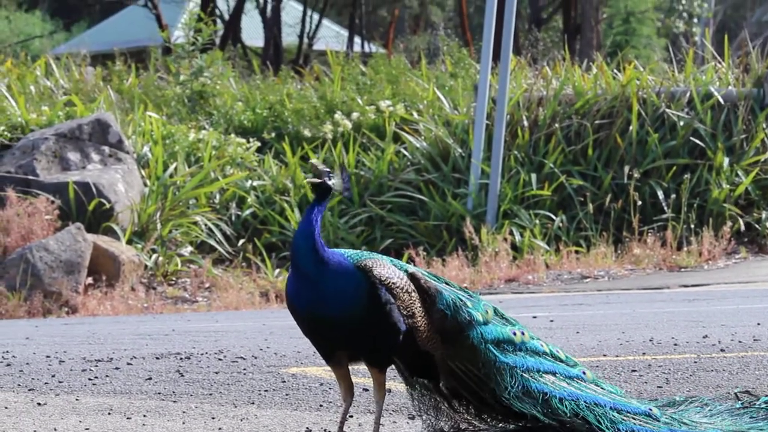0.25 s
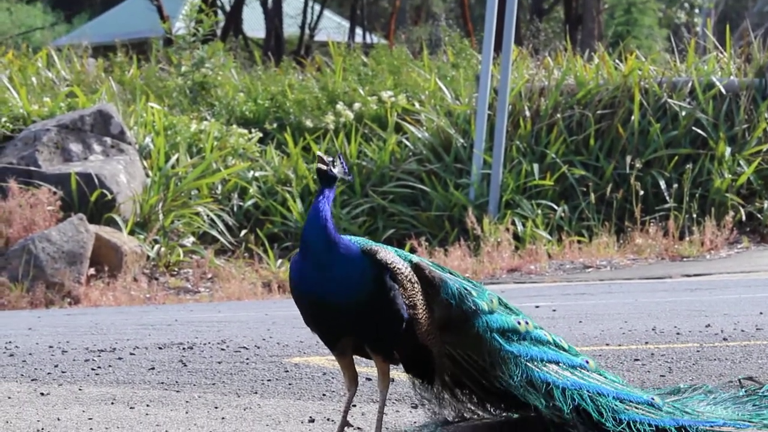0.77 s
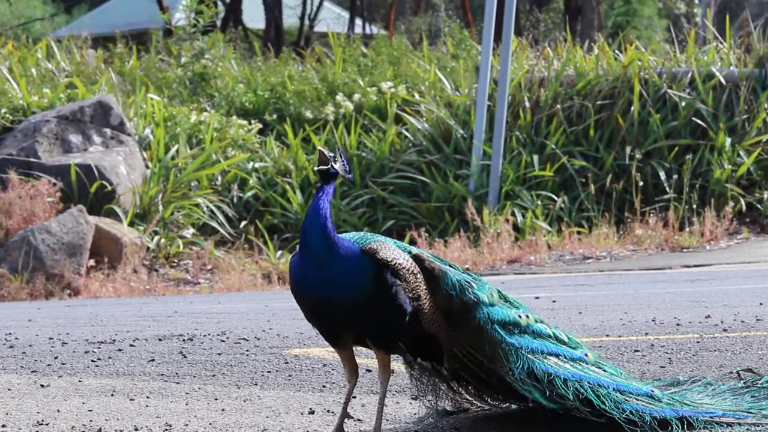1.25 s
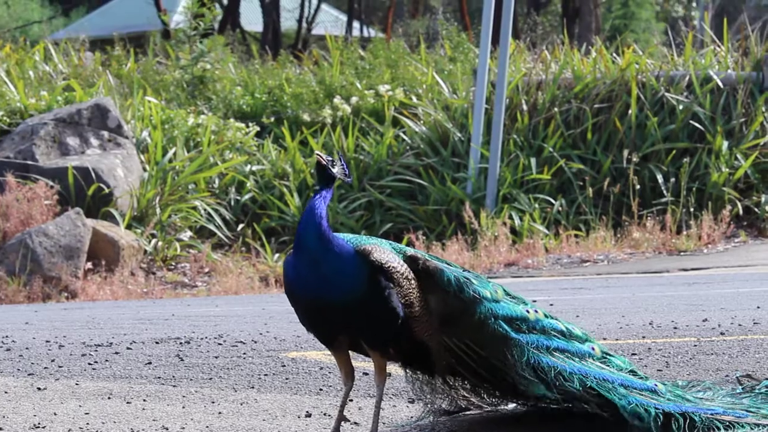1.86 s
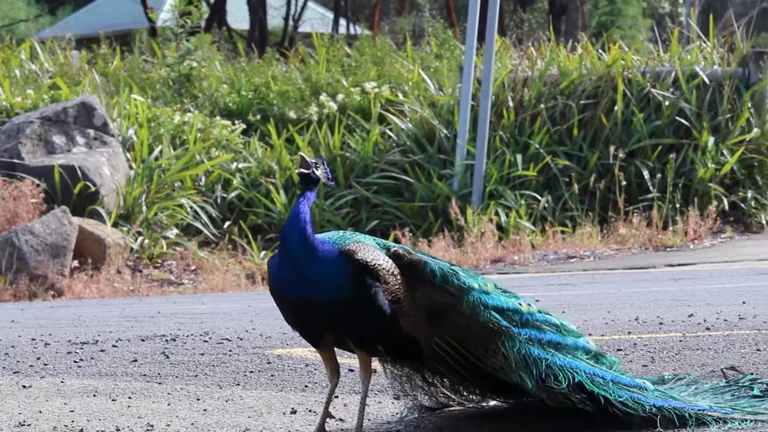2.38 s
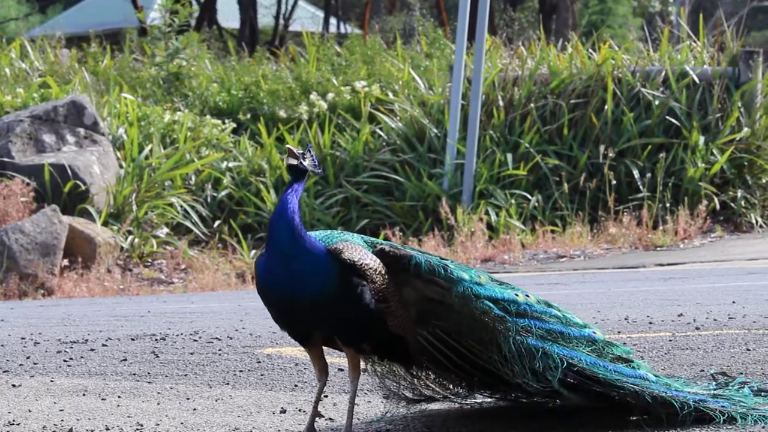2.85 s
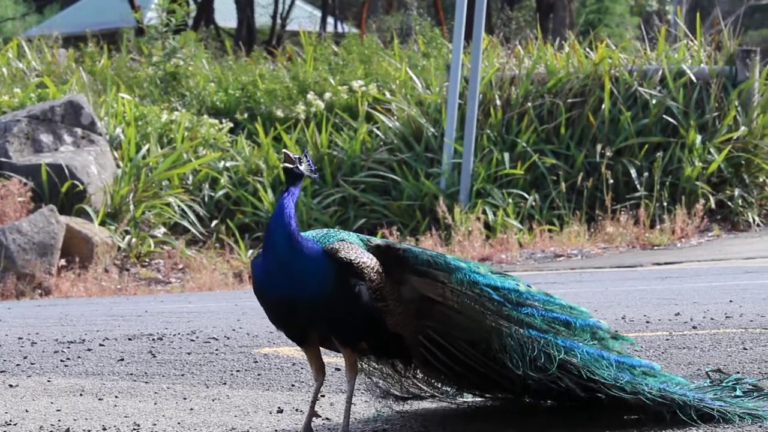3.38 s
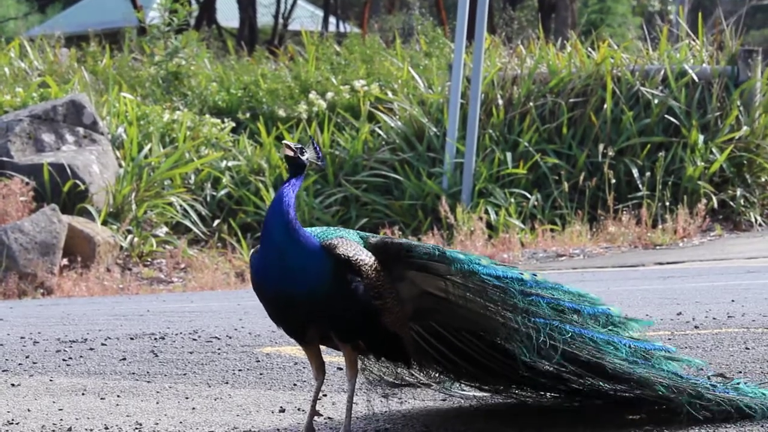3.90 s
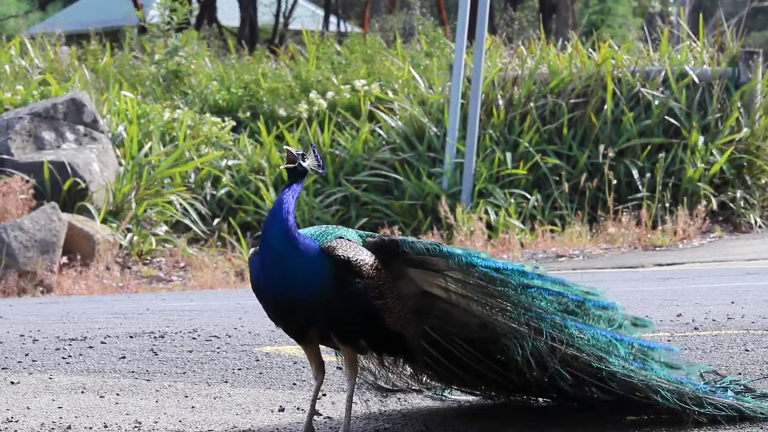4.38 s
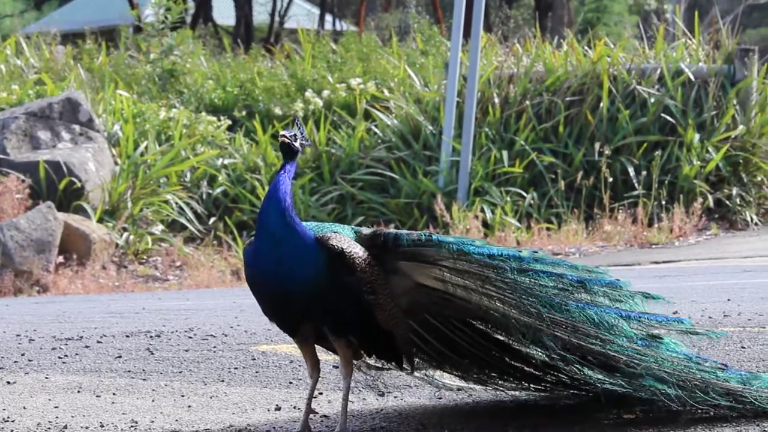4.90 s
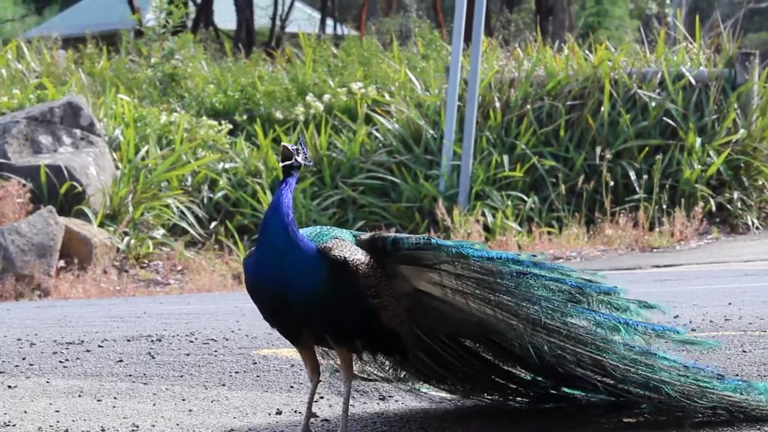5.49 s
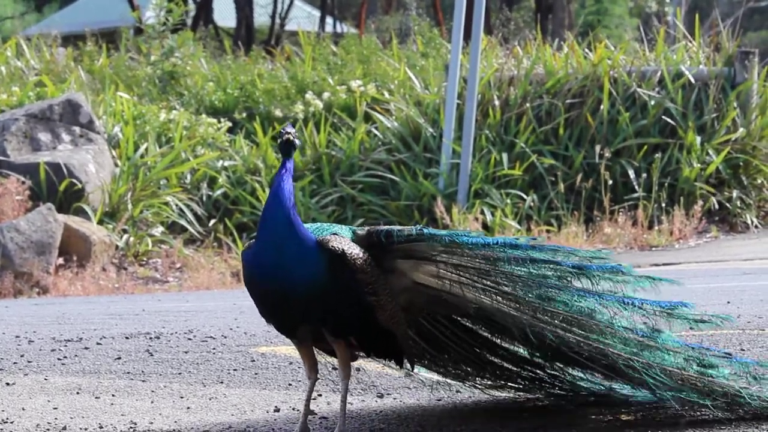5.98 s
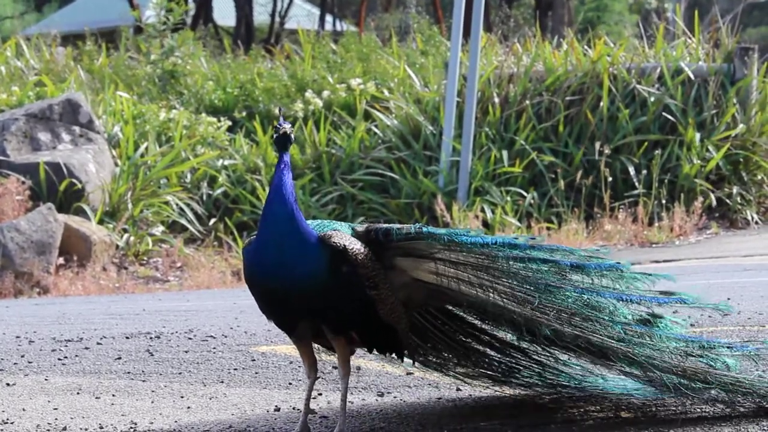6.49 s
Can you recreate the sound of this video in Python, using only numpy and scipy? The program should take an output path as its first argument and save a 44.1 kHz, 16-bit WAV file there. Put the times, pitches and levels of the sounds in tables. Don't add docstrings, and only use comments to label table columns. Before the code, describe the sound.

Outdoors by a road, a peacock close to the microphone gives six loud, brassy, wailing cries, each a little over half a second, rising quickly and sagging at the end. The first wavers; gaps gradually lengthen. Sharp near echoes and a faint tree reverberation follow each call. Low traffic rumble, tyre hiss, an idling engine and a thin insect buzz sit beneath, dipping during cries and returning between. Wind thumps softly in the later half.

```python
import sys
import numpy as np
from scipy import signal
from scipy.fft import rfft, irfft, next_fast_len
from scipy.io import wavfile
from scipy.ndimage import uniform_filter1d, map_coordinates

SR = 44100
rng = np.random.default_rng(int(sys.argv[2]) if len(sys.argv) > 2 else 0)


def how_loud(loudness_db):
    steps = np.asarray(loudness_db, float) / 20
    return 10 ** steps


def wrap_up_sound(samples):
    columns = np.atleast_2d(samples).T
    tamed = np.clip(columns, -1, 1)
    steps = np.round(tamed * 32767).astype(np.int16)
    wavfile.write(sys.argv[1], SR, steps)


N = 297523

# (start [s], highest pitch at [s], end [s], height of the arch [Hz], level [dB])
CRY_TIMES = [
    (0.181, 0.48, 0.74, 849.3, 1),
    (1.042, 1.329, 1.562, 846.2, -0.5),
    (1.899, 2.207, 2.463, 857.3, -.5),
    (2.837, 3.145, 3.429, 848.9, -.5),
    (3.898, 4.222, 4.561, 840.4, -.5),
    (5.134, 5.484, 5.822, 831.8, -0.2),
]
# (frequency [Hz], t60 [s], level [dB])
TREE_ANSWER = [(627, 1.8, -25), (1500, 2.2, -24), (2090, 1.7, -28), (2390, 1.02, -28.5), (4000, .8, -26),
               (9000, 0.53, -27)]
TREE_GAP_S = 0.04
DUCK_DB = -16


def unit(x):
    return x / np.sqrt(np.mean(x ** 2) + 1e-20)


def along(points, hz):
    f, v = np.transpose(points)
    return np.interp(np.log(hz + 1), np.log(f + 1), v)


def wobble(rate_hz, n=N):
    knots = rng.standard_normal(int(n * rate_hz / SR) + 4)
    return map_coordinates(knots, [np.arange(n) * rate_hz / SR])


def filtered(x, response):
    m = next_fast_len(N + SR // 2)
    return irfft(rfft(x, m) * response(np.fft.rfftfreq(m, 1 / SR)), m)[:N]


def course(start, top, end, top_hz, level_db):
    # (time from the top [s], effort [dB], windpipe shift [%], sharpness [dB/octave])
    shared_course = [(-.3, -10, 3, -2.5), (-.255, -9.5, 4.5, 1.4), (-.2, -12, -1.54, 0),
                     (-.15, -10.5, 0.05, -0.3), (-.036, -16, 3, 3), (.03, -10, 2.1, 3.5),
                     (.11, -10, 5, -2.45), (.22, -15.5, 4, 4), (.33, -16.5, 1, 1)]
    s = np.linspace(start, end, num=120)

    round_s = 0.02
    gone = (np.hypot(s - top, round_s) - round_s) / 0.2
    climb_hz = 95.8 * gone ** 1.15
    sink_hz = 37.97 * gone ** 1.3
    scoop_hz = 89 * np.exp((start - s) / 0.03)
    droop_hz = 79.1 * np.exp((s - end - 0.01) / 0.139)
    hz = top_hz - np.where(s < top, climb_hz, sink_hz) - scoop_hz - droop_hz

    falter_at_s, falter_width_s = 0.335, 0.025
    falter = np.exp(-0.5 * ((s - falter_at_s) / falter_width_s) ** 2)
    timid = np.clip((falter_at_s + falter_width_s - s) / falter_width_s, 0, 1)
    hz = hz - 43.1 * falter - 8 * timid

    # effort dB, shift %, sharpness dB/octave
    opening = np.exp((start - s) / 0.0386)
    closing = np.exp((s - end) / 0.1333)
    since, effort, neck, sharpness = np.transpose(shared_course)
    effort_db = np.interp(s - top, since, effort) - 15 * opening - 0.5 * closing
    shift = np.interp(s - top, since, neck) - 12 * opening - 2 * closing
    edge_db = np.interp(s - top, since, sharpness) - 6 * opening - 6.5 * closing
    effort_db = effort_db + level_db - 4.58 * falter
    return np.c_[s, hz, effort_db, shift, edge_db - 4.5 * timid]


def cry(rows):
    # (centre [Hz], half width [Hz], level [dB])
    windpipe = [(854.5, 48.5, -8.5), (1473.2, 35, -3.5), (2199, 193, 0), (2413, 30, 3), (3033, 80.4, -4),
                (3616, 83, -10), (4030, 96, -15.5), (4493, 320, -18), (5380, 82, -22.5), (6356, 372, -19),
                (7297, 320, -24.5), (8230, 190, -27.5), (8915, 91, -26), (9860, 250, -35),
                (10960, 510, -40), (13300, 570, -46)]
    # (frequency [Hz], level [dB])
    leak = [(500, -20.5), (1300, -11), (2000, -19.5), (2700, -50), (5000, -33), (9000, -34), (12000, -45.5),
            (15500, -58.5)]
    s, hz, effort_db, shift, edge_db = np.transpose(rows)
    t = np.arange(s[0], s[-1] + 0.01, 1 / SR)
    since_start_s = t - t[0]
    progress = since_start_s / (t[-1] - t[0])

    pitch = uniform_filter1d(np.interp(t, s, hz), size=500, mode="nearest")
    pitch = pitch - 52 * np.clip((t - s[-1]) / 0.0034, 0, 1)
    phase = 2 * np.pi * np.cumsum(pitch * (1 + 0.0006 * wobble(60, len(t)))) / SR
    order = np.arange(1, 25)[:, None]

    coarse = slice(None, None, 32)
    stretch = 1 + np.interp(t, s, shift) / 100
    seen_hz = order * (pitch / stretch)[coarse]
    power = how_loud(2 * along(leak, seen_hz))
    for centre, width, db in windpipe:
        power = power + how_loud(2 * db) / (1 + ((seen_hz - centre) / width) ** 2) ** 2
    gain = np.array([np.interp(t, t[coarse], row) for row in np.sqrt(power)])

    tightness = (pitch - 780) / 60
    gain = gain * how_loud(np.interp(t, s, edge_db) * np.log2(np.clip(order / 4, 1, 2.6)))
    gain = gain * how_loud(-3.6 * (order % 2 == 0) * tightness)
    gain[2] *= how_loud(3.5 - 6 * progress)
    gain[1] *= how_loud(1.47 - 3.2 * progress)

    rasp = how_loud(-60 + 11 * np.log2(order) + 4 * tightness)
    rasp = rasp + how_loud(-0.5 - 60 * since_start_s / 0.062)
    noise = rng.standard_normal(gain.shape)
    breath = unit(signal.fftconvolve(noise, np.hanning(70)[None], "same", axes=1))
    overtones = np.sin(order * phase + order ** 2 * 0.65)
    voice = np.sum(gain * (1 + rasp * breath) * overtones, axis=0)
    edges = np.clip(since_start_s / 0.013, 0, 1) * np.clip((t[-1] - t) / 0.0099, 0, 1)
    return how_loud(np.interp(t, s, effort_db) + 2.5) * edges * voice


def peacock():
    bird = np.zeros(N)
    for row in CRY_TIMES:
        voice = cry(course(*row))
        bird[round(row[0] * SR):][:len(voice)] += voice
    return bird


def diffuse(x, answer, gap_s):
    hz, t, z = signal.stft(rng.standard_normal(2 * SR), SR, nperseg=128)
    band, t60, db = np.transpose(answer)
    decay = how_loud(-60 * t / along(np.c_[band, t60], hz)[:, None])
    decay = decay / np.linalg.norm(decay, axis=1, keepdims=True)
    decay = decay * how_loud(along(np.c_[band, db], hz))[:, None]
    tail = signal.istft(z * decay, SR, nperseg=128)[1] / 8
    return signal.fftconvolve(x, np.pad(tail, (round(gap_s * SR), 0)))[:len(x)]


def outdoors(x):
    # (delay [ms], signed gain [ratio])
    surfaces = [(1.782, -0.003), (2.395, -0.19), (2.523, -0.15), (4.053, -0.32), (5.555, -0.27),
                (6.369, -0.18), (7.338, 0.044), (8.317, -0.14), (8.707, -0.14), (10.562, 0.17),
                (12.476, 0.19), (12.939, -0.31), (14.484, 0.13), (19.924, -0.08), (20.675, -0.075),
                (31.036, 0.21), (32.025, 0.15), (32.861, 0.092)]
    # (frequency [Hz], t60 [s], level [dB])
    gravel_answer = [(1000, 0.061, -43), (2850, 0.034, -3.5), (5200, 0.021, 2), (11800, 0.012, 3.5)]
    yard_answer = [(600, 0.34, -7), (1500, 0.31, -2.5), (2035, 0.38, -6), (2520, 0.28, -12.5),
                   (3500, 0.24, -9.5), (5860, 0.31, -7.5), (12050, 0.18, -5.5)]

    def comb(hz):
        return 1 + sum(g * np.exp(-2j * np.pi * hz * ms / 1000) for ms, g in surfaces)

    gravel = diffuse(x, gravel_answer, gap_s=0.002)
    yard = diffuse(x, yard_answer, gap_s=0.011)
    trees = diffuse(x, TREE_ANSWER, gap_s=TREE_GAP_S)
    return filtered(x, comb) + gravel + yard + trees


def earlier_cry():
    voice = cry(course(*CRY_TIMES[1]))
    padded = np.pad(voice, (0, 2 * SR + SR // 4))
    left = how_loud(14.5) * diffuse(padded, TREE_ANSWER, gap_s=TREE_GAP_S)[-2 * SR:]
    return np.pad(left, (0, N - len(left)))


def ducking_db():
    wait_s, fall_s, recover_db_per_s = 0.065, 0.16, 14
    s, db = [0], [-7]
    for start in [row[0] + wait_s for row in CRY_TIMES] + [N / SR]:
        recovered_db = db[-1] + recover_db_per_s * (start - s[-1])
        s += [start, start + fall_s]
        db += [recovered_db, DUCK_DB]
    return np.interp(np.arange(N) / SR, s, db)


def rush(spectrum, patchy_db):
    z = signal.stft(rng.standard_normal(N), nperseg=512)[2]
    field = uniform_filter1d(rng.standard_normal(z.shape), 6, 0)
    field = uniform_filter1d(field, 14, 1)
    noise = signal.istft(z * how_loud(patchy_db * unit(field)), nperseg=512)[1][:N]
    return unit(filtered(noise, lambda hz: how_loud(along(spectrum, hz))))


def road_rumble(road_db):
    # (frequency [Hz], level per Hz [dB])
    road_spectrum = [(15, -40), (25, -6.5), (92, 1), (119, -7), (430, -2), (753, -9.5), (1020, -10),
                     (2090, -25.5), (2310, -26), (3000, -26), (3900, -35), (6600, -120)]
    return how_loud(road_db + 5 + 0.9 * wobble(9)) * rush(road_spectrum, patchy_db=1.5)


def tyre_hiss(road_db, duck_db):
    # (frequency [Hz], level per Hz [dB])
    tyre_spectrum = [(710, -32), (1200, -6), (1590, -8), (1920, 4), (2310, -5.5), (2800, -3.5),
                     (3740, -8.5), (4580, -8.5), (4890, -13.5), (6600, -15), (14100, -41), (15600, -54)]
    tyre_db = -8 - 0.42 * (duck_db - DUCK_DB / 2)
    return how_loud(road_db + tyre_db + 0.8 * wobble(4)) * rush(tyre_spectrum, patchy_db=0.8)


def idling_engine(road_db, duck_db):
    # (order [multiple of idle_hz], level [dB])
    engine_orders = [(1, 1.5), (2, 1), (3, -8.5), (4, -2), (5, -25.5), (6, -7)]
    idle_hz = 45.77
    idle_db = road_db - 1.5 + 0.11 * (duck_db - DUCK_DB / 2) + 1.3 * wobble(3.91)
    crank = 2 * np.pi * idle_hz * np.cumsum(1 + 0.01277 * wobble(5)) / SR
    engine = sum(how_loud(db + 0.78 * wobble(18)) * np.sin(k * crank + k * k) for k, db in engine_orders)
    return how_loud(idle_db + 2.5) * unit(engine)


def insect(duck_db):
    wing_hz, strokes_per_s, pitch_hold_s = 4480, 48.8, 0.008
    stroke = np.cumsum(strokes_per_s * (1 + 0.008 * wobble(3))) / SR % 1
    swell = np.sin(np.pi * stroke) ** 0.59 * how_loud(0.716 * wobble(34))
    wing = np.sin(2 * np.pi * np.cumsum(wing_hz * (1 + 0.0034 * wobble(1 / pitch_hold_s))) / SR)
    return how_loud(-53 - 0.36 * duck_db) * unit(swell * wing)


def background():
    # (time [s], road level at full gain [dB])
    traffic_levels = [(0, -34), (1.5, -36), (3, -36.5), (4.3, -36), (5.3, -35.5), (6.3, -37), (6.62, -34),
                      (6.75, -37.5)]
    duck_db = ducking_db()
    road_db = np.interp(np.arange(N) / SR, *np.transpose(traffic_levels))
    traffic = road_rumble(road_db) + tyre_hiss(road_db, duck_db)
    return traffic + idling_engine(road_db, duck_db) + insect(duck_db)


def wind():
    # (time [s], peak level [dB], frequency [Hz])
    wind_bumps = [(3.819, -34, 105), (3.858, -22.5, 39.7), (3.899, -32, 64.6), (4.178, -30, 158),
                  (4.2, -27, 72.7), (4.23, -25.5, 128), (4.247, -31.5, 88.8), (4.279, -30.5, 84.1),
                  (4.309, -25, 85), (4.355, -32, 113), (4.378, -23, 122), (4.409, -29, 42.9),
                  (4.428, -29, 78.1), (4.549, -26, 40.2), (4.629, -30, 94.2), (4.789, -42, 77.6),
                  (4.939, -19.5, 67.1), (4.969, -35, 44)]
    out = np.zeros(N)
    t = np.arange(SR // 8) / SR
    for s, db, hz in wind_bumps:
        envelope = how_loud(db + 9.5 - 60 * t / 0.04) * (1 - np.exp(-t / 0.0025))
        out[round(s * SR):][:len(t)] += envelope * np.sin(2 * np.pi * hz * t)
    return out


def scene():
    gain = how_loud(ducking_db())
    heard = outdoors(peacock() / gain) + background() + earlier_cry()
    return (gain * heard + wind())[None]


def top_cut(x):
    return signal.sosfilt(signal.butter(12, 15710, fs=SR, output="sos"), x)


def record(dry):
    # (frequency [Hz], level [dB])
    mic_colour = [(20, -12), (40, -4), (12000, -1), (14500, -12), (15700, -14)]
    heard = filtered(dry[0], lambda hz: how_loud(along(mic_colour, hz)))[None]
    limited = heard / (1 + np.abs(heard / 0.98) ** 8) ** (1 / 8)
    return top_cut(limited)


dry = scene()
out = record(dry)
wrap_up_sound(out)
```